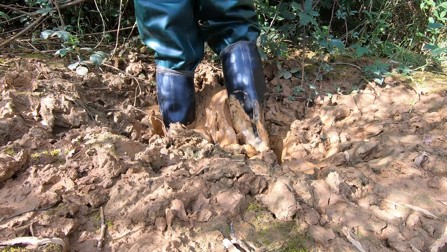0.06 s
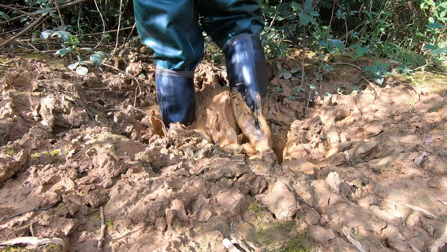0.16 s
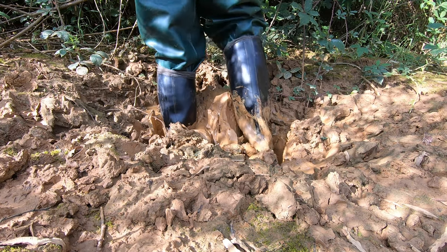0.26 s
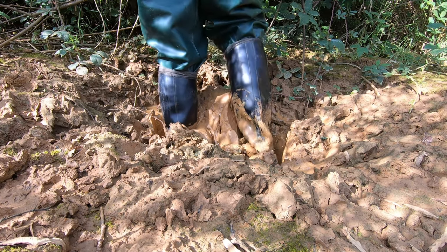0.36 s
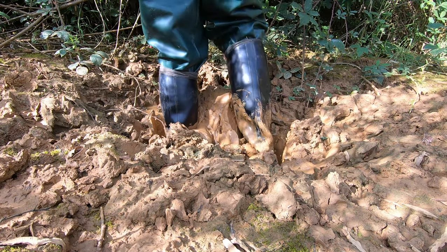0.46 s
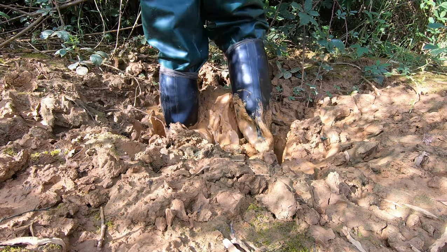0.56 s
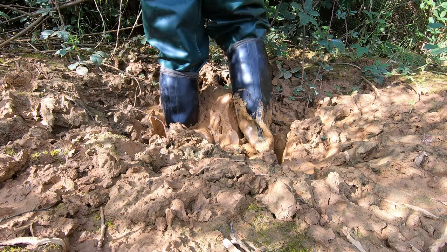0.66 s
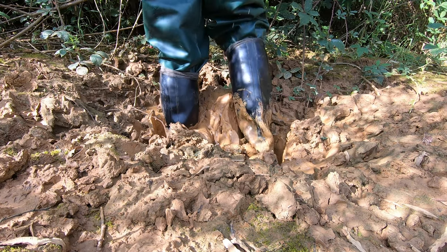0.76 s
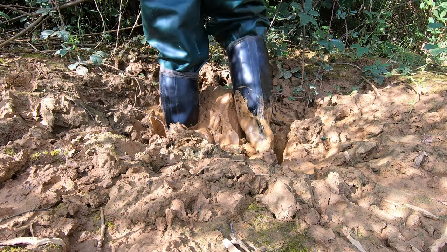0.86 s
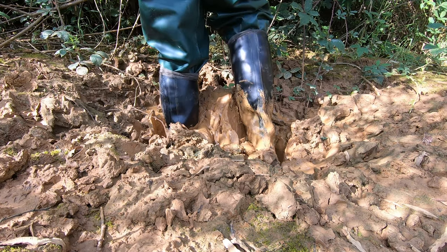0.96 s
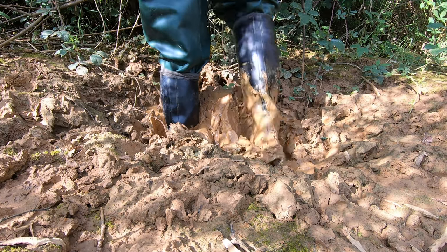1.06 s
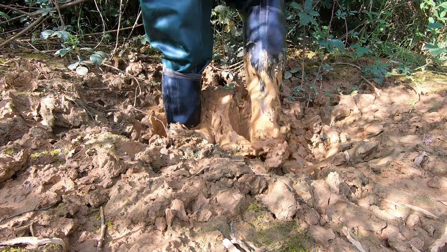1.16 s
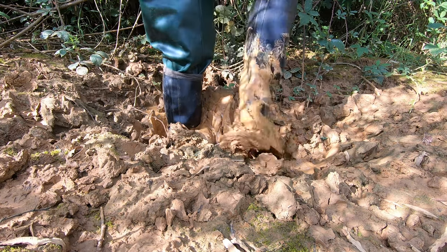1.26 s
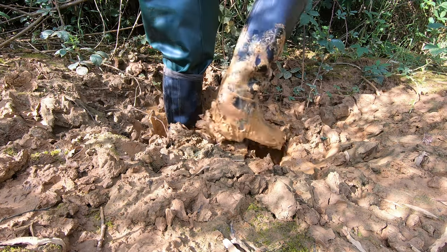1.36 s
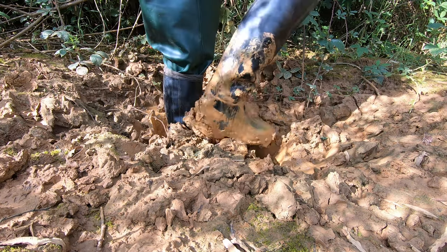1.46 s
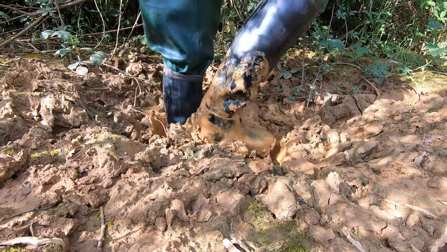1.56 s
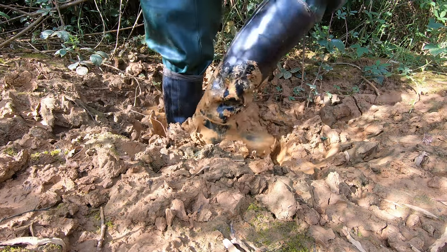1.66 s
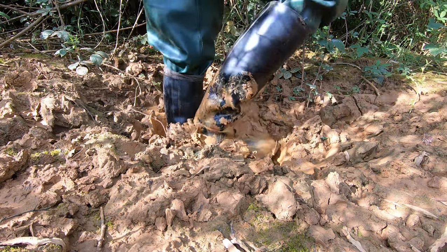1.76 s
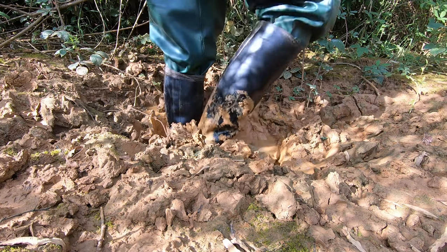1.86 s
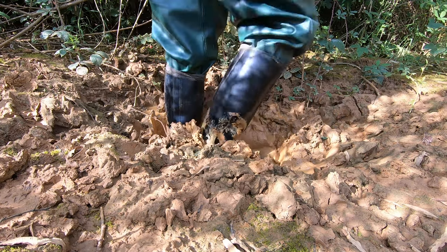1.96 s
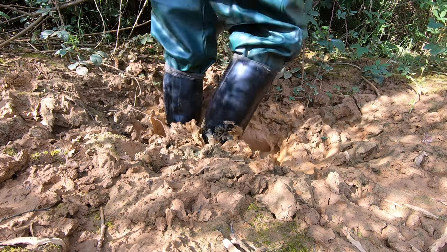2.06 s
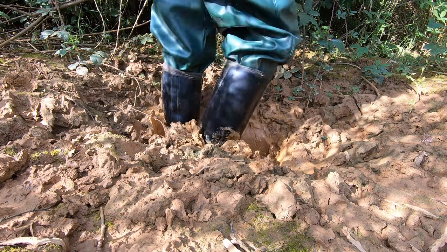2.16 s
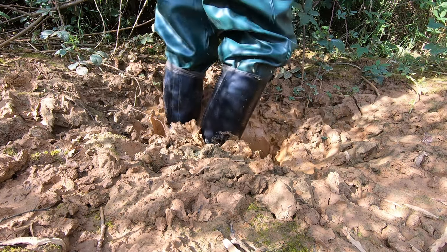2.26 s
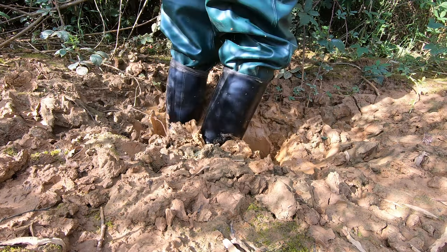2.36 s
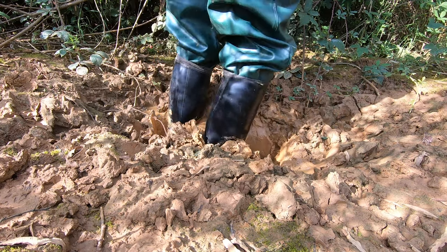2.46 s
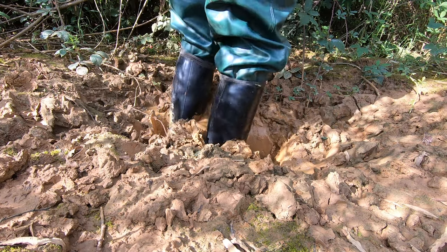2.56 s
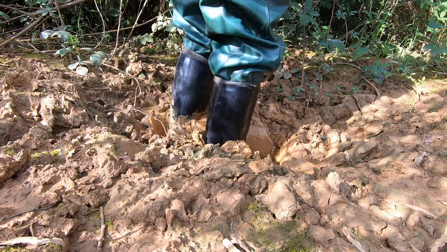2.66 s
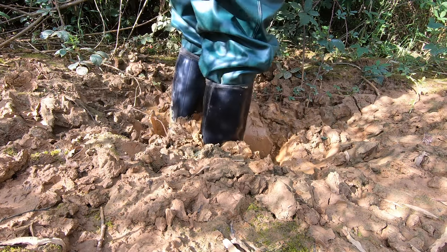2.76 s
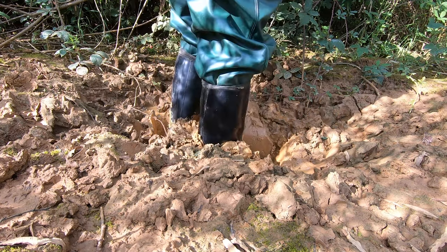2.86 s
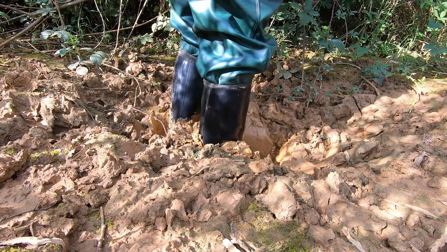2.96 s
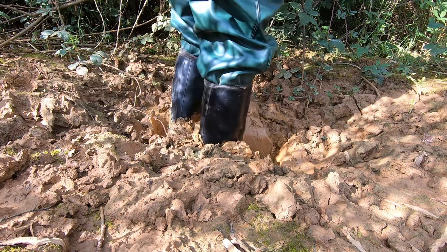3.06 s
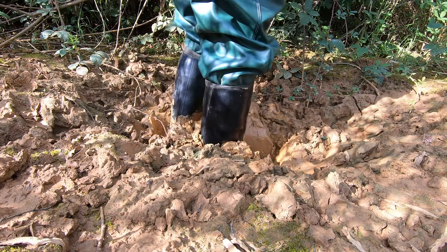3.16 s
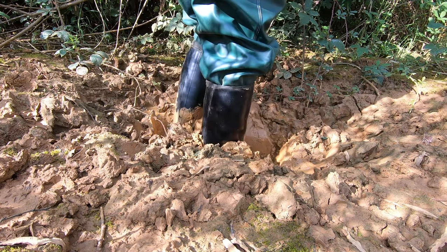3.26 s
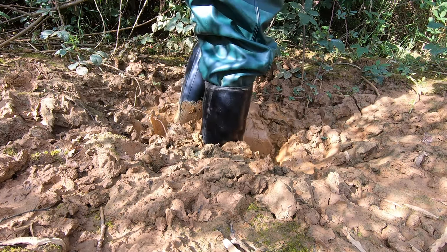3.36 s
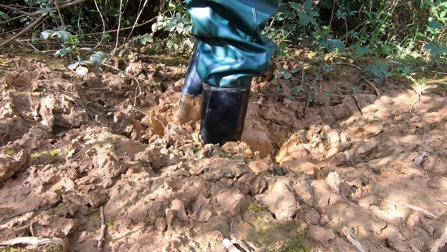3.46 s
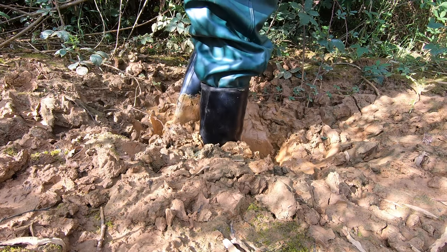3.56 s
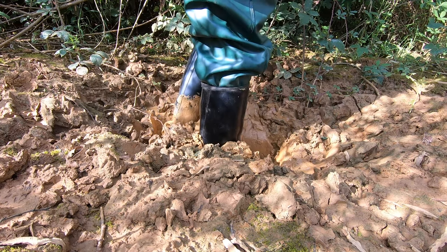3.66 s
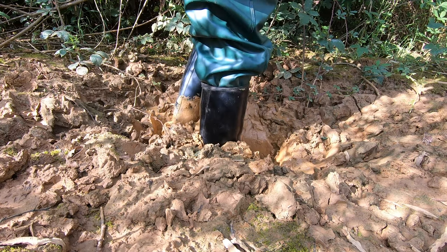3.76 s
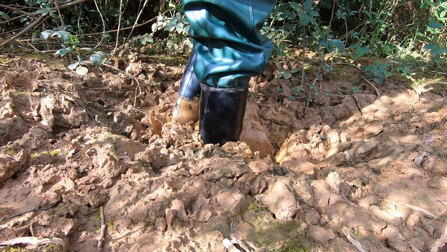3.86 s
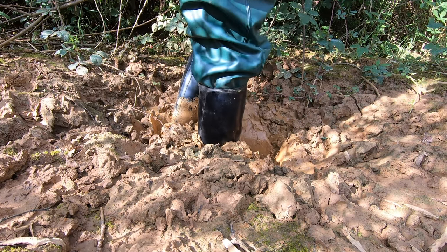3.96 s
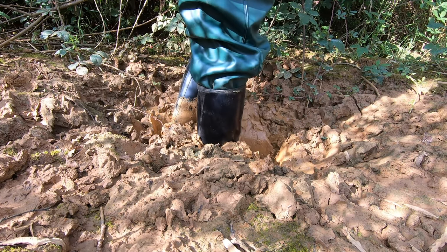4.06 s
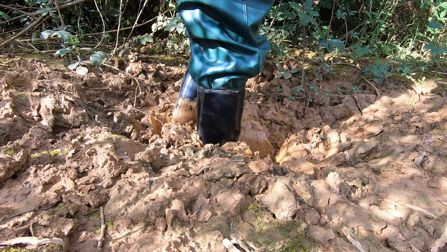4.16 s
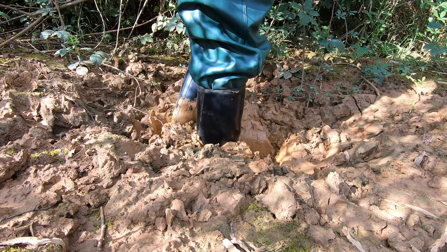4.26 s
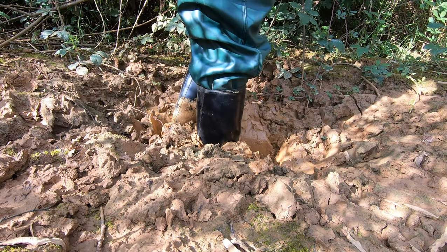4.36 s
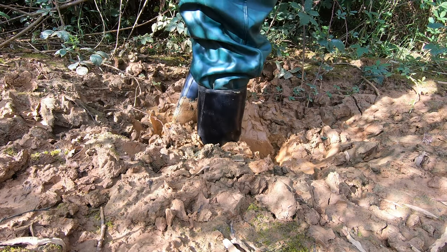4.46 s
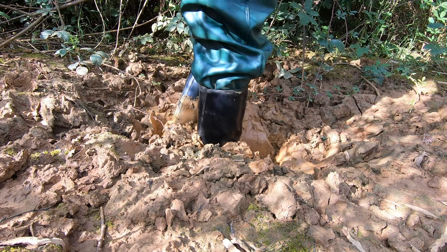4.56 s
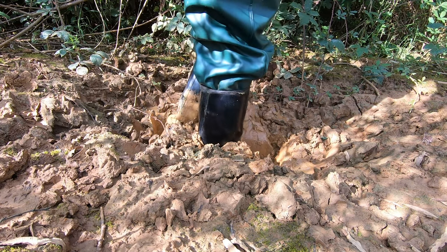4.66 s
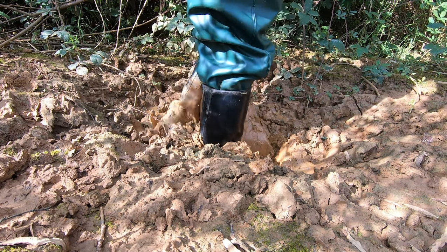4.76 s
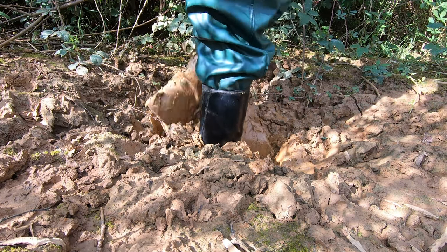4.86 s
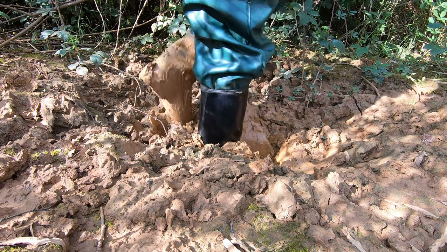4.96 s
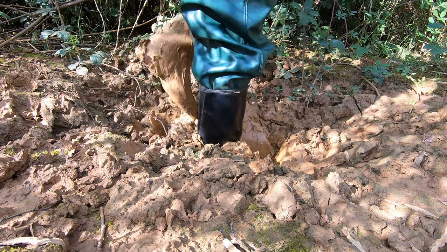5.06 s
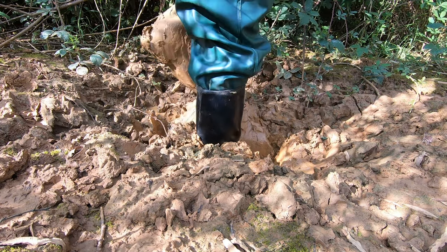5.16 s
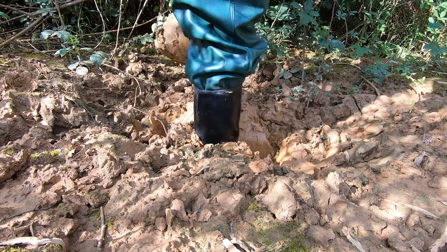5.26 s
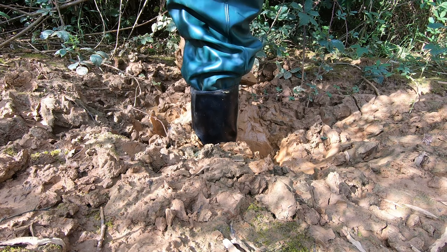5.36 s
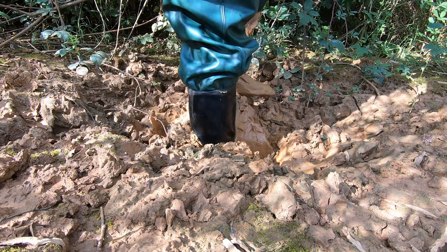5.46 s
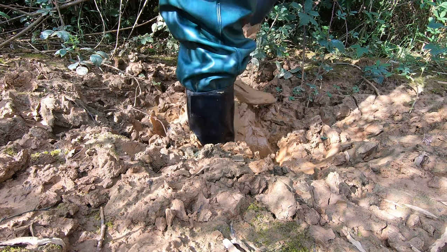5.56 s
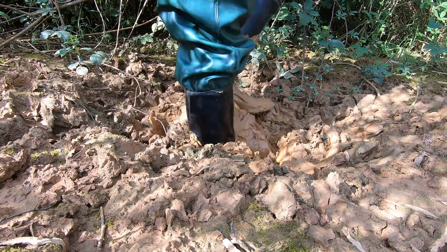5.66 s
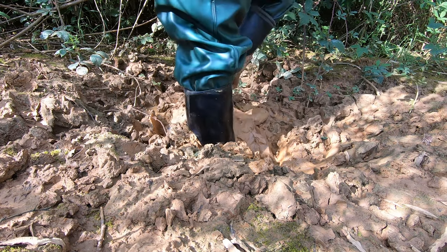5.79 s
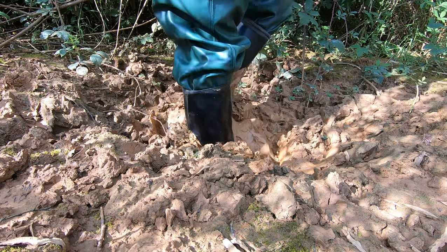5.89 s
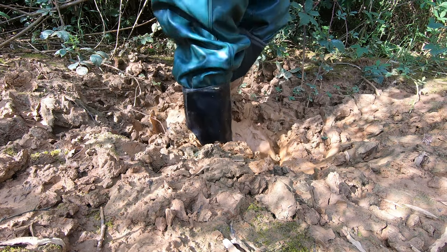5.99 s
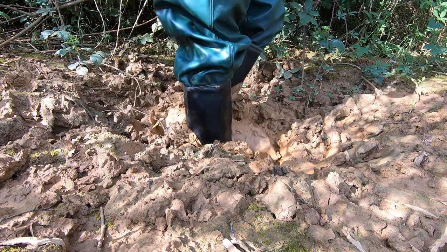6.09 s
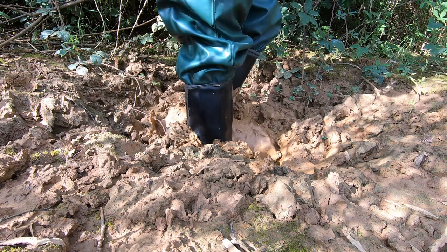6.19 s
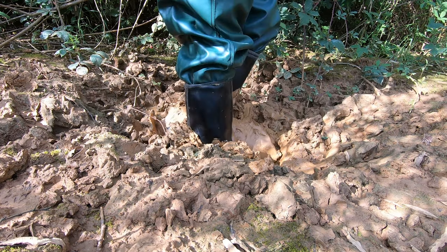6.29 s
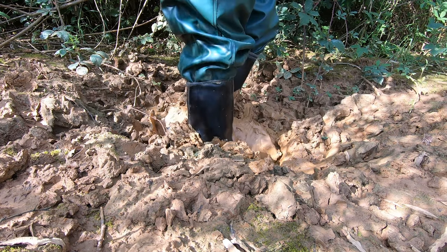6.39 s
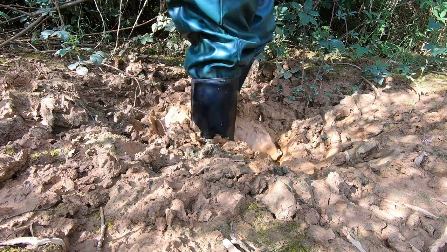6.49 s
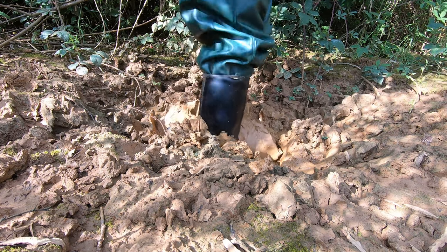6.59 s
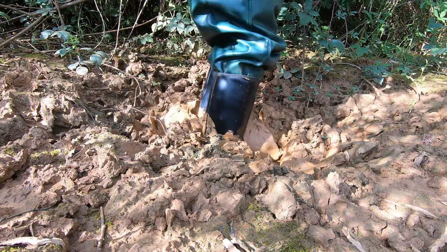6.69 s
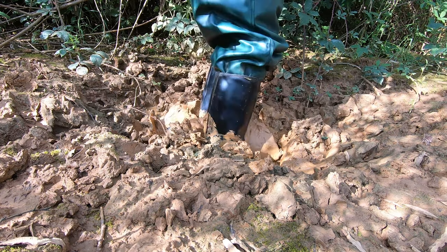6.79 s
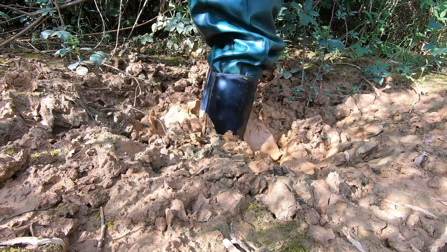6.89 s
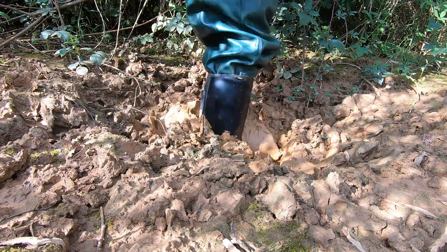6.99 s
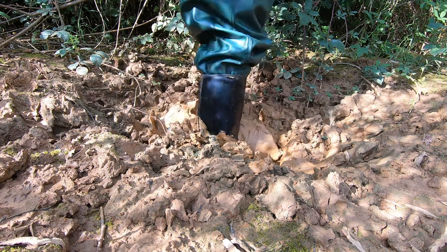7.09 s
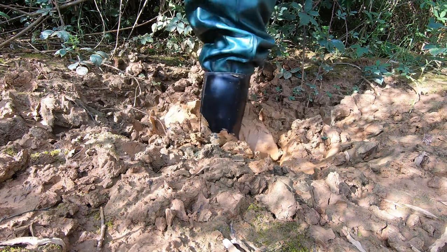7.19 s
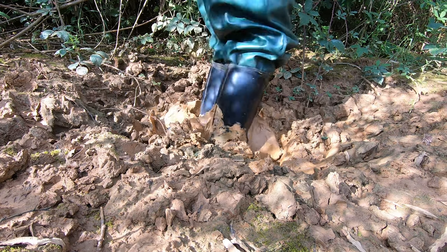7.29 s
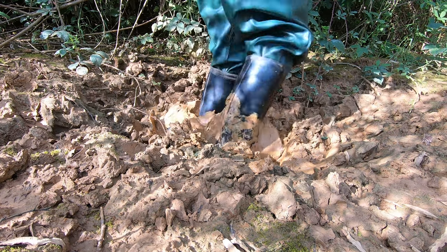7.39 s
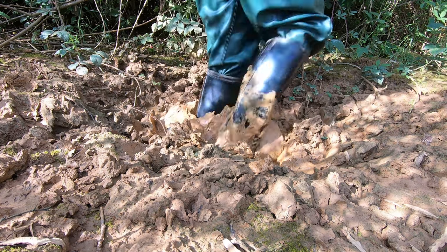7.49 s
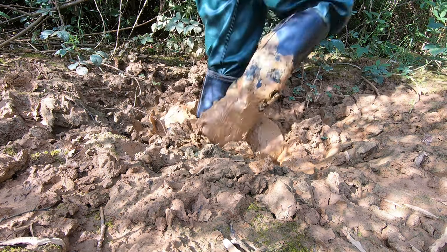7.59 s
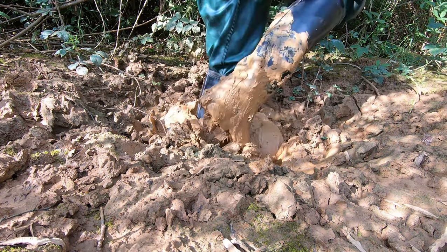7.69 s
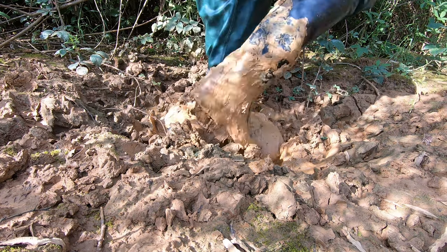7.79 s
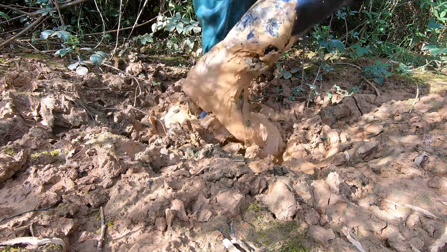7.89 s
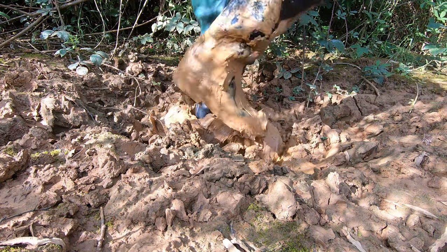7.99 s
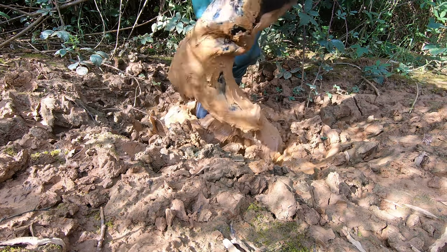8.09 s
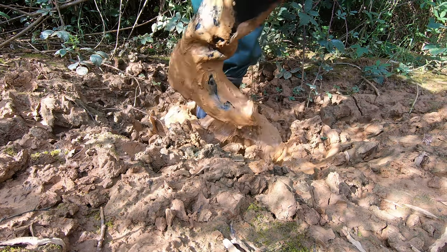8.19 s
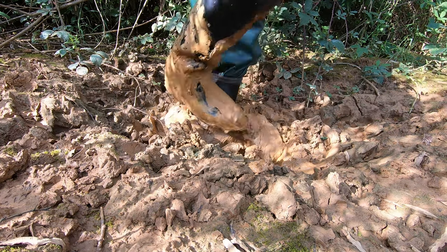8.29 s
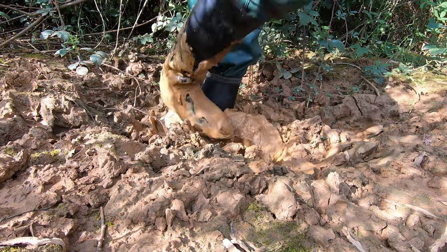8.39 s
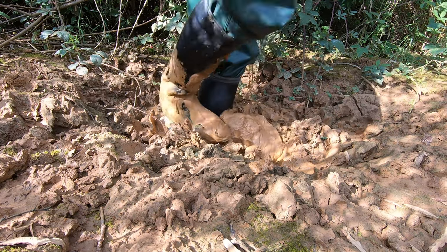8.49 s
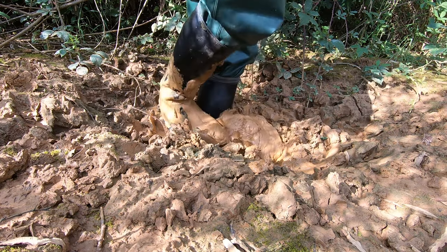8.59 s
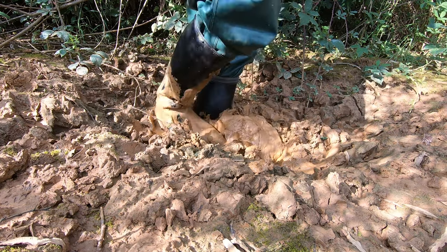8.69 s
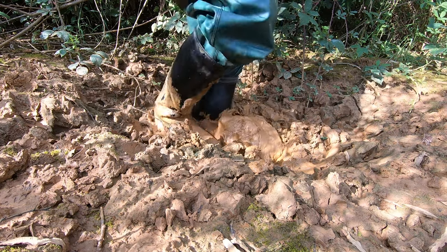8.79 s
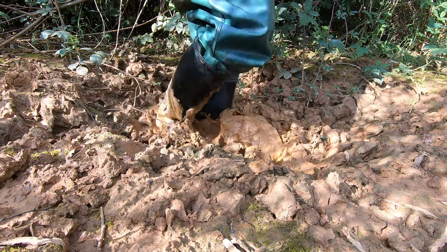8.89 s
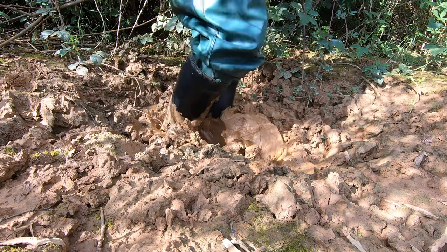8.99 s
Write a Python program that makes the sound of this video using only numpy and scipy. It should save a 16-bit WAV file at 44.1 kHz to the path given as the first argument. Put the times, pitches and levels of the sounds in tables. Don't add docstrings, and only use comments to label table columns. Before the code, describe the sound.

Rubber boots tread deep sticky wet clay, squelching, sucking, popping and smacking in irregular bursts, with quiet gaps over a faint outdoor hush.

```python
import sys
import numpy as np
from scipy import signal
from scipy.fft import rfft, irfft, next_fast_len
from scipy.io import wavfile
from scipy.ndimage import uniform_filter1d, map_coordinates

SR = 44100
rng = np.random.default_rng(int(sys.argv[2]) if len(sys.argv) > 2 else 0)


def gain_from_db(level_db):
    decades = np.asarray(level_db, float) / 20
    return 10 ** decades


def wrap_up_sound(samples):
    columns = np.atleast_2d(samples).T
    tamed = np.clip(columns, -1, 1)
    steps = np.round(tamed * 32767).astype(np.int16)
    wavfile.write(sys.argv[1], SR, steps)


N = 398663

# peak_s, rise_s, fall_s, peak_db, pocket_hz
POCKETS = [(0.0, .01, .11, -19, 677.2), (0.271, 0.0064, 0.38, -51.5, 705.6),
           (0.889, 0.0026, 0.099, -31.5, 750.8), (1.76, 0.05, 0.12, -31.5, 1801),
           (1.98, 0.027, 0.054, -33, 877.5), (2.067, 0.059, 0.078, -34, 1655),
           (2.286, 0.02, 0.066, -29.5, 1348), (2.56, .16, 0.0066, -27.5, 879.8),
           (2.659, 0.048, 0.026, -35, 469.4), (3.347, 0.046, 0.03, -22, 880), (4.67, 0.083, 0.11, -30, 715),
           (7.301, .04, 0.087, -40, 601), (7.384, 0.0045, 0.025, -27.5, 1285),
           (7.497, 0.042, 0.053, -22.5, 620.4), (8.034, 0.065, 0.04, -47, 1247),
           (8.752, 0.035, 0.085, -45.5, 1445), (8.865, 0.084, 0.053, -46, 1553),
           (8.975, 0.031, 0.077, -35, 737.6)]
# peak_s, rise_s, fall_s, peak_db, slit_hz
JETS = [(0.0, .01, 0.11, -33, 3369), (0.318, 0.072, 0.21, -49.5, 2970), (.886, 0.0038, 0.076, -33.5, 2800),
        (1.75, 0.047, 0.11, -37, 2700), (1.98, 0.019, 0.073, -27.5, 3506), (2.055, 0.044, 0.074, -28, 2200),
        (2.291, 0.017, 0.096, -25, 1960), (2.44, 0.12, 0.14, -38, 2250), (3.349, 0.04, 0.037, -28.5, 2770),
        (4.72, 0.094, 0.068, -29.5, 2900), (5.941, 0.055, 0.046, -38, 2700), (7.3, 0.03, 0.11, -41, 3100),
        (7.385, 0.0047, 0.025, -28.5, 2368), (7.488, 0.039, 0.041, -27.5, 2120),
        (7.606, 0.0055, .016, -36, 3398), (8.019, 0.11, 0.087, -54, 2490), (8.7, 0.023, 0.017, -45.5, 2600),
        (8.76, 0.026, 0.038, -39.5, 3190), (8.944, 0.0152, 0.013, -35, 3000), (8.975, 0.034, .1, -29, 2900)]
# peak_s, rise_s, fall_s, peak_db, pitch_hz
GULPS = [(.09, 0.074, 0.086, -34, 235), (.275, 0.012, 0.1019, -37, 191.4), (.47, 0.2, 0.1426, -40.5, 140),
         (.97, 0.071, 0.095, -31, 160.1), (1.76, 0.038, 0.11, -49.5, 289.7),
         (1.975, 0.021, 0.0636, -36.5, 290), (2.27, 0.0059, 0.1696, -36, 318.7),
         (2.56, 0.18, 0.012, -35, 339.9), (2.68, 0.1, 0.052, -37, 305.1), (3.325, 0.047, 0.057, -31, 203),
         (4.7, .1, 0.094, -35.5, 197.2), (7.3, 0.045, 0.145, -36.5, 251), (7.385, 0.018, 0.014, -24, 200.1),
         (7.48, 0.071, 0.12, -31, 203.1), (8.03, 0.086, 0.075, -58.5, 208),
         (8.74, 0.02, 0.0321, -45, 226.5), (8.875, 0.051, 0.045, -49, 330.1),
         (8.975, 0.031, 0.046, -34, 245.8)]
# peak_s, rise_s, fall_s, peak_db, cloth_rustle_over_it_db
CREEPS = [(0.0, .01, 0.17, -36, 5.5), (.45, 0.04, 0.13, -60, 10), (1.17, 0.31, 1, -47, 2),
          (1.9, 0.15, 0.11, -54.5, 3), (2.42, 0.3, 0.25, -37, -3), (2.8, 0.52, 0.16, -49.5, -1),
          (3.4, 1, 1, -57, 1.5), (4.05, 0.12, 0.45, -59.5, -2), (4.81, 0.43, 0.83, -52.5, 0.5),
          (5.08, 0.15, 0.4, -54, 2), (5.88, 0.42, 1, -48, 1.5), (6.7, 0.25, 0.087, -41, -4),
          (7.0, 0.16, 0.37, -54.5, -1.5), (7.45, 0.25, 0.37, -47.5, 8), (7.85, 0.53, 0.28, -48.5, 0),
          (8.4, 0.72, 1, -60.5, 1), (9.0, 0.49, 0.18, -52, 6.5)]
SPAN_DB, AIR_ROUND, CREEP_ROUND = 15, 1.7, 1.4

# time_s, peak_db, hollow_hz, slit_hz, slit_over_hollow_db
SMACKS = [(0.287, -29.5, 290.0, 3030, -4), (0.914, -22.5, 980, 1700.0, -1),
          (0.951, -23.5, 375, 1870.0, -18), (1.262, -23, 1370.0, 1830.0, -11),
          (1.8302, -15.5, 1320.0, 2200, -4.5), (1.7575, -19, 1400, 2120, -3),
          (2.466, -19, 695, 1970.0, -15), (2.5441, -16.5, 950, 2060, -8),
          (2.5512, -10.5, 875, 2400, -27), (4.6963, -21, 896, 1669, 4), (3.3636, -11.5, 940, 4800, -5),
          (4.1072, -36.5, 1240, 2270, -12), (4.6782, -22, 389.6, 2418, -2),
          (5.8434, -16.5, 764, 2580, -9), (6.5801, -20.5, 1270, 3420, -8),
          (6.6663, -28.5, 390.0, 3470.0, -9), (6.679, -39, 437, 2190.0, -16),
          (6.779, -36, 275, 3620.0, -1), (7.458, -26, 900, 2200, -9), (7.5041, -9, 830, 2000, -16),
          (8.8458, -30, 1705, 2890, -8), (8.9442, -23, 1261, 4006, -11),
          (0.3333, -30.5, 910, 3200.0, -5), (0.5867, -28, 760.0, 2480, 8),
                 (1.3144, -28, 1219, 2700, -0.5), (1.3523, -30.5, 1250.0, 2260.0, -2),
                 (1.393, -31, 550.0, 2160, 11), (1.474, -34, 1380, 2270.0, -5),
                 (1.5558, -40, 890.0, 5100, 15), (1.7629, -21, 1350.0, 1960, -3),
                 (1.769, -13.5, 1520.0, 2140.0, -1), (1.781, -33, 1570, 1700.0, -8),
                 (1.7874, -13, 1500, 2320, -6), (1.796, -28, 1300, 2600, -3),
                 (1.9895, -17, 1130.0, 3380, 2), (2.043, -31, 1080.0, 2060.0, 14.0),
                 (2.0539, -27, 1680.0, 2220, 14.0), (2.3044, -17, 1570.0, 1900, -2),
                 (2.3365, -15, 1535, 1930, 4), (3.3356, -16.5, 309, 2680, 2),
                 (3.5143, -32.5, 1080, 2403, -3), (4.6022, -26.5, 660.6, 1890.0, 0),
                 (4.7249, -17, 890.0, 2900, 1), (4.7399, -17, 1583, 3145, 2),
                 (5.7429, -24, 1490.0, 4740, 4), (5.758, -27.5, 1510, 3045, 0),
                 (5.776, -28.5, 1010, 3180, 14), (5.787, -33, 1000, 3200, 8), (6.59, -28.5, 290, 2650, 7),
                 (7.4812, -10, 1340, 2171, -4.5), (7.621, -27, 1282, 3110.0, 10),
                 (7.3773, -6.5, 1332, 2350, -2.5), (2.642, -28, 1400, 3200, -3),
                 (8.5057, -34, 1520, 3010, -1), (8.752, -26, 253, 3170.0, 6),
                 (8.9758, -17, 870.0, 2866, -9)]
# time_s, peak_db, pitch_hz
DROPLETS = [(.9642, -37, 10000), (1.0071, -37, 7800), (5.89, -30, 6800), (1.1772, -37, 11000),
            (1.288, -33.5, 7720), (1.3523, -34, 7500), (1.52, -35, 8300), (5.481, -36, 9330),
            (5.6179, -43, 9400), (5.711, -40.5, 10500), (7.6288, -28, 7273), (5.853, -28, 6240),
            (8.787, -28, 5610)]
# time_s, peak_db, ring_hz
RINGING = [(0.431, -23.5, 3130), (0.447, -21.5, 2580), (.46, -28.5, 4200), (0.5865, -18, 2304),
           (0.887, -19, 6600), (1.1784, -23.5, 2560), (1.7316, -13, 3900), (1.7447, -13.5, 1835),
           (2.188, -19, 2180), (2.294, -17, 1820), (3.02, -29.5, 5470), (3.4424, -21, 3980),
           (3.27, -36, 6800), (3.5026, -33, 3250), (3.623, -40, 3700), (3.637, -36, 2470),
           (5.7104, -29.5, 6900), (5.7636, -23, 3260), (5.878, -19.5, 2000), (5.8026, -26.5, 3230),
           (6.075, -34, 3600), (6.0976, -25.5, 4800), (7.3767, -7.5, 2360), (7.602, -19, 3395),
           (8.703, -30, 2560), (8.7275, -29, 3270), (8.765, -21.5, 3198), (9.0085, -22, 2267),
           (5.277, -31.5, 2800), (6.753, -32.5, 6440)]
# time_s, peak_db, ring_hz
TEARING = [(1.0962, -31.5, 1630), (1.753, -46, 1980), (1.786, -26, 4070), (1.8168, -25, 1600),
           (1.842, -19.5, 2320), (1.854, -35, 2080), (1.9822, -17.5, 3730), (2.134, -27, 2910),
           (2.149, -20.5, 3900), (2.167, -24.5, 3300), (2.43, -19.5, 1650), (4.571, -35, 1933),
           (4.5808, -29, 1690), (4.65, -21, 1680), (4.784, -23.5, 5510), (5.4824, -28.5, 2840),
           (5.619, -34.5, 3200), (5.744, -30, 3400), (5.827, -26, 2530), (5.87, -23.5, 2560),
           (5.893, -28.5, 2820), (5.9506, -27, 3970), (6.579, -29.5, 2830), (7.2947, -28, 3113),
           (8.493, -37, 3300), (8.5898, -34, 2100), (8.631, -34, 2120), (8.6629, -31.5, 4330),
           (8.6801, -40, 2170), (8.96, -16, 4470)]
# time_s, peak_db, pitch_hz
POPS = [(0.041, -4, 590), (0.584, -28, 830), (0.907, -10.5, 284), (1.25, -22.5, 1510), (1.591, -26.5, 403),
        (1.971, -11.5, 940), (2.146, -19, 940), (2.184, -25, 1475), (2.251, -10, 332), (2.271, -4, 1095),
        (2.442, -13, 972), (2.501, -6, 892), (2.515, -11, 935), (2.542, -13.5, 800), (2.556, -2.5, 908),
        (2.607, -21.5, 412), (2.653, -13.5, 359), (2.873, -32.5, 754.4), (3.314, -11, 372),
        (3.363, -27, 1300), (4.126, -40, 1200), (5.868, -13, 478), (5.915, -25.5, 1262),
        (6.577, -25, 250.6), (6.843, -38.5, 720), (6.932, -40, 716), (6.978, -42, 800), (7.375, -2, 1336),
        (7.396, -14, 1440), (8.975, -20, 790)]
# middle_s, length_s, level_db, from_hz, to_hz
WHISTLES = [(.165, 0.0265, -30, 180, 174), (.31, 0.061, -48, 3050, 3040), (1.775, .1, -37.5, 196, 210),
            (1.847, 0.058, -34, 255, 243), (1.765, 0.038, -31, 2000, 2300), (2.05, .035, -30, 2200, 2166),
            (2.3, 0.051, -37, 1788, 2000), (3.38, 0.068, -28, 1420, 1340), (3.345, 0.042, -36, 2714, 2750),
            (3.36, 0.044, -33, 5300, 4920), (4.6, 0.088, -39.5, 1950, 1600), (4.7, 0.086, -37, 700, 880),
            (4.8, .03, -41, 300, 305), (7.473, 0.042, -26, 1333, 1300), (7.48, 0.04, -30.5, 2200, 2090),
            (7.497, 0.05, -22, 480, 630), (8.692, 0.047, -40, 1900, 2750), (8.975, 0.041, -30, 2900, 2760),
            (9.018, 0.037, -31, 2400, 2020), (4.745, 0.063, -41, 5740, 5400),
            (4.62, .12, -41.5, 4950, 4750), (8.88, 0.078, -47, 360, 345), (6.851, 0.016, -49, 300, 270),
            (6.936, 0.019, -44, 250, 280), (6.982, 0.012, -41, 320, 285)]
# start_s, length_s, gap_s, peak_db, pitch_hz
LEAKS = [
    (2.766, .1, .0115, -40, 1200),
    (3.999, .1, .0156, -44.5, 1200),
    (8.81, .095, .0115, -43, 1560),
]
# start_s, level_db, pitch_hz, length_s
THUDS = [
    (2.024, -38.5, 55.5, 0.17),
    (7.458, -35.5, 53.4, 0.23),
]

# freq_hz, level_db
GURGLE_TONE = [(24, -51), (40, -23), (91, 12.5), (195, -13), (246, -20), (500, -11), (650, -76)]
# freq_hz, level_db
SPUTTER_TONE = [(300, -60), (760, -23.5), (1300, -13), (1770, 5.5), (2170, -14.5), (2540, -16), (3690, 6),
                (4130, -14), (5200, -7), (7500, -89)]
# freq_hz, level_db
SPIT_TONE = [(2470, -37), (4200, -9.5), (6630, -1.5), (8720, -11), (10400, -16), (11800, -26.5),
             (14500, -26)]
# freq_hz, level_db
OOZE_BODY = [(65, -34.5), (110, -81), (140, 0.5), (178, 1.5), (492, -4), (1500, -7), (1950, -20.5),
             (3300, -120)]
# freq_hz, level_db
OOZE_CRISP = [(880, -9.5), (1500, -3.5), (1910, -5), (2680, -3.5), (3050, -6), (7770, -17.5), (14000, -34)]
# freq_hz, level_db
TREMOR_TONE = [(15, -14), (30, -12), (60, 10), (110, -28), (200, -89)]
# freq_hz, level_db
HUSH_TONE = [(15, -25), (25, 8), (92, -16.5), (141, -5.5), (534, -8.5), (2780, -9.5), (4220, -19.5),
             (7500, -15), (10300, -28), (13000, -79.5)]
# freq_hz, likeness_0_to_1
HUSH_ALIKE = [(60, 0.66), (300, 0.098), (700, 0.033), (3000, 0.057), (8000, 0.017)]

# freq_hz, difference_db
PORT_DB = [(60, -5.5), (300, -4), (700, -4.5), (1300, 2.5), (2400, -2.5), (8000, 0), (12000, -8.5)]
# freq_hz, phase_rad
PORT_LEAD = [(60, 0.56), (200, -0.062), (860, 1), (2100, -0.8), (5000, 0.69), (7000, 0.55), (9000, -1.74)]
# time_s, left_over_right_db
STANCE = [(0.1, 1), (1, 3), (2.3, 0.8), (2.7, 2.5), (7.35, 2), (7.5, 1.5), (8, 1.5)]
# freq_hz, time_to_fall_60_db_s
BANK = [(200, 0.12), (2000, 0.07), (10000, 0.17)]


def sputter(db, hz, lumps):
    fizz = grains(count=9000, hz=hz, spread=0.22, cycles=20, scatter_db=2.5, length=260)
    hiss = 0.5 * coloured(SPUTTER_TONE, patchy_db=5.5)
    hiss = hiss + band(hz, width_hz=180) + 0.35 * band(1.8 * hz, width_hz=250)
    return gain_from_db(db) * unit(lumps * hiss + 0.8 * fizz)


def pocket(db, hz, lumps):
    skirt_tone = [(130, -35), (250, -13), (400, 5.5), (900, 8.5), (1500, -2.5), (2000, -41)]
    skirt = coloured(skirt_tone, patchy_db=5.5)
    bubbles = grains(count=1500, hz=hz, spread=0.184, cycles=15.6, scatter_db=7.0, length=750)
    return gain_from_db(db) * unit(lumps * (band(hz, width_hz=195) + 0.96 * skirt) + 0.69 * bubbles)


def gurgle(db, hz):
    boom = 0.3 * (170 / hz) ** 3 * coloured(GURGLE_TONE)
    lumps = gain_from_db(4.0 * wobble(45))
    return gain_from_db(db) * unit(lumps * (band(hz, width_hz=125, order=4) + boom))


def spit(db, lumps):
    mid = coloured(SPIT_TONE, patchy_db=5)
    side = 0.55 * coloured(SPIT_TONE, patchy_db=5)
    spurts = lumps ** 0.39 * gain_from_db(0.59 * wobble(300))
    return gain_from_db(db) * unit(spurts * np.array([mid + side, mid - side]))


def smacks():
    swing_db, puff_db = -0.5, -11
    s, db, hollow_hz, slit_hz, over_db = np.transpose(SMACKS)
    low_size = gain_from_db(db + swing_db - np.maximum(over_db, 0))
    high_size = gain_from_db(db + swing_db + np.minimum(over_db, 0))
    low = rings(s, low_size, hollow_hz, 11.4 / hollow_hz, rise=0.03, attack=0.27, length=900)
    high = rings(s, high_size, slit_hz, 28 / slit_hz, rise=0.018, attack=0.39, length=500)
    puff_size = gain_from_db(db + puff_db + np.minimum(over_db, 0) / 2)
    blows = np.bincount(np.round(s * SR).astype(int), puff_size, N)
    puffs = signal.fftconvolve(blows, puff(t60=0.03))[:N]
    puff_tone = [(200, -20.5), (600, 1.5), (2500, -4.5), (6000, -14.0), (12000, -56)]
    s, db, hz = np.transpose(DROPLETS)
    ticks = cluster(s, db - 7, hz, np.full(len(s), 0.012), spread=0.16, attack=0.5, apart=0.0012)
    return low + high + ticks + puffs * coloured(puff_tone, patchy_db=5.0)


def snaps():
    s, db, hz = np.transpose(RINGING + TEARING)
    crack_db = np.repeat([-30, -13], [len(RINGING), len(TEARING)])
    s = s + 0.0007
    click = rings(s, gain_from_db(db + 1), 0.9 * hz, np.full(len(s), 0.003), rise=0, attack=0.1, length=400)
    ring = cluster(s, db - 7.0, hz, np.full(len(s), 0.011), spread=0.2, attack=1.0, apart=0.0006)
    blows = np.bincount(np.round(s * SR).astype(int), gain_from_db(db + crack_db), N)[:N]
    burst = signal.fftconvolve(blows, puff(t60=0.039))[:N]
    crack_tone = [(500, -30), (1500, -2), (4500, 0), (7500, -3), (11000, -18), (16000, -60)]
    return click + ring + burst * coloured(crack_tone, patchy_db=5)


def pops():
    s, db, hz = np.transpose(POPS)
    t60 = 0.027 * gain_from_db(-0.52 * np.maximum(db + 10.5, 0))
    return cluster(s + 0.00091, db - 4.5, hz, t60, spread=0.14, attack=1.66, apart=0.00201)


def whistles():
    out = np.zeros(N)
    flutter, waver = flapping(110, sharpness=1.6, scatter_db=3), wobble(220)
    for s, length, db, from_hz, to_hz in WHISTLES:
        first, last = round((s - length / 2) * SR), round((s + length / 2) * SR)
        at = np.arange(first, min(last, N))
        u = (at - at[0]) / SR / length
        hz = (from_hz + (to_hz - from_hz) * u) * (1 + 0.035 * waver[at])
        phase = 2 * np.pi * np.cumsum(hz) / SR
        chop = uniform_filter1d(flutter[at], size=int(2 * SR / from_hz))
        out[at] += gain_from_db(db + 4.5) * np.sin(np.pi * u) * chop * np.sin(phase)
    return out


def burble():
    rows = []
    for start, length, gap, db, hz in LEAKS:
        rows += [(start + k * gap, db, hz) for k in range(9) if k * gap < length]
    s, db, hz = np.transpose(rows)
    t60 = np.full(len(s), 0.009)
    high = cluster(s, db, hz, t60, spread=0.08, attack=0.44, apart=0.001)
    low = cluster(s, db, 0.4 * hz, t60, spread=0.21, attack=0.43, apart=0.0013)
    return high + low


def ooze():
    body_db, rustle_db, _ = swells(CREEPS, CREEP_ROUND)
    clumps = gain_from_db(2.1 * wobble(90))
    crackle = grains(1200, np.full(N, 2700.), spread=0.33, cycles=10.6, scatter_db=1.2, length=230)
    blips = grains(500, np.full(N, 700.), spread=0.496, cycles=10.6, scatter_db=1.4, length=700)
    body = clumps * coloured(OOZE_BODY, patchy_db=2.0) + 0.2 * blips
    crisp = clumps * coloured(OOZE_CRISP, patchy_db=3) + 0.44 * crackle
    return gain_from_db(body_db) * unit(body) + gain_from_db(body_db + rustle_db) * unit(crisp)


def thuds():
    t, skew_rad = np.arange(N) / SR, np.array([[0.35], [-0.35]])
    out = np.zeros((2, N))
    for s, db, hz, length in THUDS:
        swell = np.sin(np.pi * np.clip((t - s) / length, 0, 1)) ** 2
        out += gain_from_db(db) * swell * np.sin(2 * np.pi * hz * (t - s) + skew_rad)
    return out


def tremor(gulp_db, gulp_hz):
    shake = filtered(rng.standard_normal((2, N)), lambda hz: gain_from_db(along(TREMOR_TONE, hz)))
    return gain_from_db(gulp_db - 15.5) * (200 / gulp_hz) ** 2 * unit(shake)


def bank(x):
    hz, t, z = signal.stft(rng.standard_normal((2, SR // 4)), SR, nperseg=256)
    fade = gain_from_db(-60 * t / along(BANK, hz)[:, None])
    tail = signal.istft(z * fade, SR, nperseg=256)[1]
    late = np.pad(x, (130, 0))[None]
    return signal.fftconvolve(late, tail / np.linalg.norm(tail[0]), axes=1)[:, :N]


def hush():
    def mid_side(hz):
        lean = np.arccos(np.clip(along(HUSH_ALIKE, hz), -1, 1)) / 2
        return gain_from_db(along(HUSH_TONE, hz)) * [np.cos(lean), np.sin(lean)]
    mid, side = filtered(rng.standard_normal((2, N)), mid_side)
    return gain_from_db(-60.5 + 0.7 * wobble(2.164)) * unit(np.array([mid + side, mid - side]))


def swells(rows, curvature):
    peak, rise, fall, db, value = np.transpose(rows)[:, :, None]
    late = np.arange(0, N + 16, 16) / SR - peak
    way = np.where(late < 0, -late / np.maximum(rise, 0.001), late / np.maximum(fall, 0.001))
    power = gain_from_db(2 * np.maximum(db - SPAN_DB * way ** curvature, -140))
    lead = (power / power.max(0)) ** 3
    blend = lambda v: (lead * v).sum(0) / lead.sum(0)
    fallen = np.clip(way * (late > 0), 0, 2)
    coarse = 10 * np.log10(power.sum(0)), blend(value), blend(fallen)
    return [np.interp(np.arange(N) / 16, np.arange(len(c)), c) for c in coarse]


def flapping(rate, sharpness, scatter_db):
    turns = np.cumsum(rate * gain_from_db(2.5 * wobble(12) + 1.6 * wobble(90))) / SR
    sizes = gain_from_db(scatter_db * rng.standard_normal(N // 40))
    return sizes[turns.astype(int) % (N // 40)] * np.exp(-sharpness * (turns % 1))


def puff(t60):
    t = np.arange(SR // 20) / SR
    return 2 * gain_from_db(-60 * t / t60) * (1 - np.exp(-t / 0.0021))


def rings(s, size, hz, t60, rise, attack, length):
    t = np.arange(length) / SR
    hz, t60 = np.clip(hz, 30, SR / 2.5)[:, None], np.clip(t60, 1e-3, 1)[:, None]
    wave = np.sin(2 * np.pi * hz * t * (1 + rise * t / t60))
    wave = wave * gain_from_db(-60 * t / t60) * (1 - np.exp(-t * hz / attack))
    at = np.round(s * SR).astype(int)[:, None] + np.arange(length)
    return np.bincount(at.ravel(), (size[:, None] * wave).ravel(), N + length + SR)[:N]


def cluster(s, db, hz, t60, spread, attack, apart):
    g = rng.standard_normal((3, len(s), 3))
    g[0] = 0
    length = int(max(t60) * SR)
    out = np.zeros(N)
    for a, b, c in np.swapaxes(g, 1, 2):
        size, pitch = gain_from_db(db + 2.3 * b), hz * np.exp(spread * c)
        out += rings(s + apart * abs(a), size, pitch, t60, 0.034, attack, length)
    return out


def grains(count, hz, spread, cycles, scatter_db, length):
    u, g = rng.random((count, 2)), rng.standard_normal(count)
    pitch = hz[(u[:, 0] * N).astype(int)] * np.exp(spread * g)
    size = gain_from_db(-abs(scatter_db) * np.log(1 - 0.97 * u[:, 1]))
    return unit(rings(u[:, 0] * N / SR, size, pitch, cycles / pitch, 0.35, 0.027, length))


def band(hz, width_hz, order=2):
    slow = filtered(rng.standard_normal((2, N)), lambda f: 1 / (1 + (f / width_hz) ** order))
    phase = 2 * np.pi * np.cumsum(hz) / SR
    return unit(slow[0] * np.cos(phase) + slow[1] * np.sin(phase))


def coloured(spectrum, patchy_db=0):
    z = signal.stft(rng.standard_normal(N + 512), nperseg=256)[2]
    field = uniform_filter1d(rng.standard_normal(z.shape), size=2, axis=0)
    field = uniform_filter1d(field, size=16, axis=1)
    noise = signal.istft(z * gain_from_db(patchy_db * unit(field)), nperseg=256)[1][:N]
    return unit(filtered(noise, lambda hz: gain_from_db(along(spectrum, hz))))


def wobble(rate):
    knots = rng.standard_normal(int(N * 400 / SR) + 4)
    return map_coordinates(knots, [np.arange(N) * min(rate, 400) / SR])


def filtered(x, response):
    m = next_fast_len(N + 8192)
    return irfft(rfft(x, m) * response(np.fft.rfftfreq(m, 1 / SR)), m)[..., :N]


def along(points, hz):
    f, v = np.transpose(points)
    return np.interp(np.log(hz + 1), np.log(f + 1), v)


def unit(x):
    return x / np.sqrt(np.mean(np.abs(x) ** 2) + 1e-20)


def scene():
    gulp_db, gulp_hz, _ = swells(GULPS, AIR_ROUND)
    pocket_db, pocket_hz, emptied = swells(POCKETS, AIR_ROUND)
    jet_db, slit_hz, _ = swells(JETS, AIR_ROUND)
    pocket_hz = pocket_hz * (1 + 0.12 * emptied)

    lumps = gain_from_db(3.6 * wobble(60)) * flapping(150, sharpness=1.17, scatter_db=2.0)
    air = pocket(pocket_db, pocket_hz, lumps) + sputter(jet_db, slit_hz, lumps)
    small = air + ooze() + snaps() + pops() + smacks() + whistles() + burble()
    small = filtered(small, lambda hz: 1 / (1 + (95 / (hz + 1)) ** 4))
    mud = gurgle(gulp_db, gulp_hz) + small

    half = np.array([[0.5], [-0.5]])
    ports = lambda hz: gain_from_db(half * along(PORT_DB, hz)) * np.exp(1j * half * along(PORT_LEAD, hz))
    stance_db = np.interp(np.arange(N) / SR, *np.transpose(STANCE))
    near = filtered(gain_from_db(half * stance_db) * mud, ports) + spit(jet_db - 8, lumps)
    scattered = bank(filtered(mud, lambda hz: 1 / (1 + (450 / (hz + 1)) ** 3)))
    return near + gain_from_db(-9.5) * scattered + thuds() + hush() + tremor(gulp_db, gulp_hz)


def roll_off(x):
    return signal.sosfilt(signal.butter(12, 15710, fs=SR, output="sos"), x)


def record(dry):
    mix = filtered(dry, lambda hz: 1 / (1 + (42 / (hz + 1)) ** 4) / (1 + (hz / 13500) ** 8))
    return roll_off(mix)


dry = scene()
out = record(dry)
wrap_up_sound(out)
```